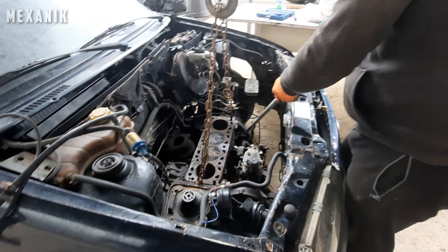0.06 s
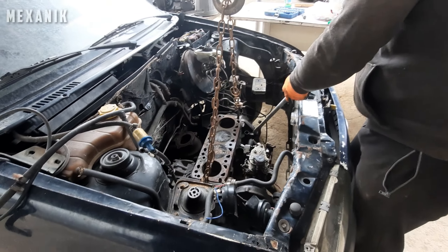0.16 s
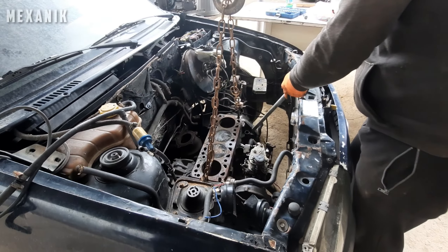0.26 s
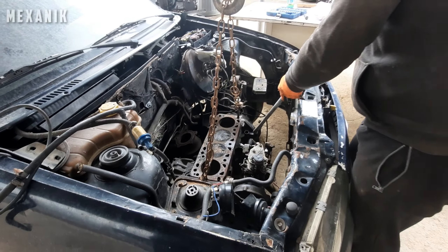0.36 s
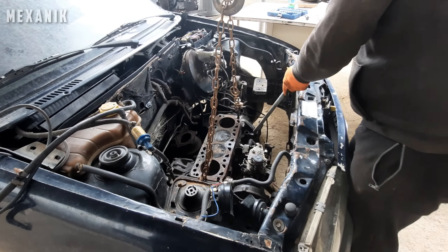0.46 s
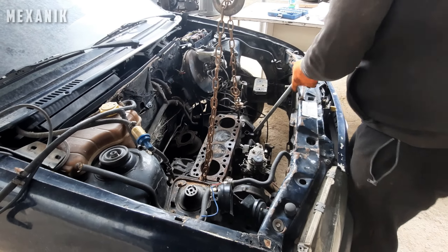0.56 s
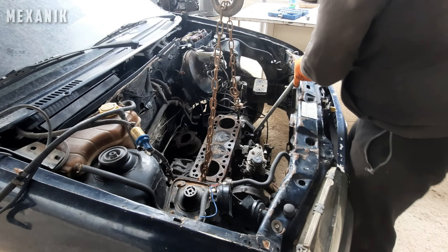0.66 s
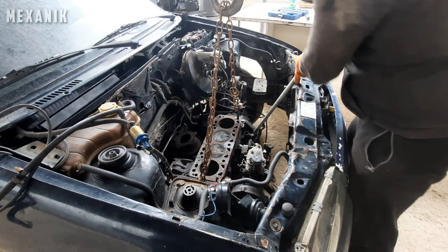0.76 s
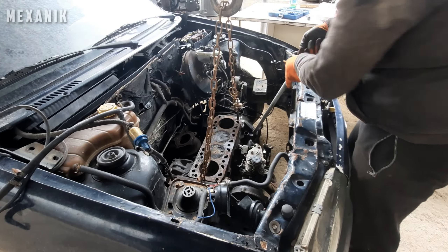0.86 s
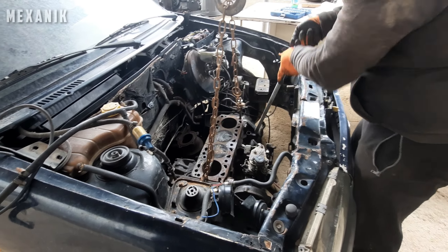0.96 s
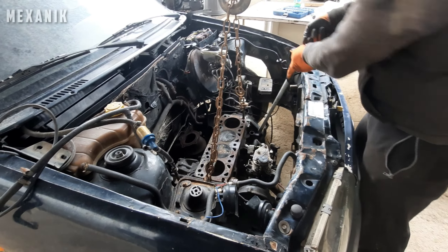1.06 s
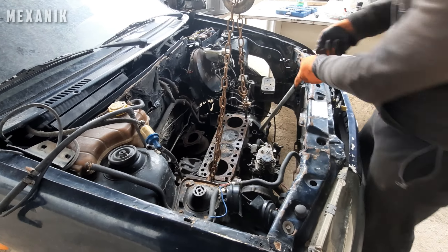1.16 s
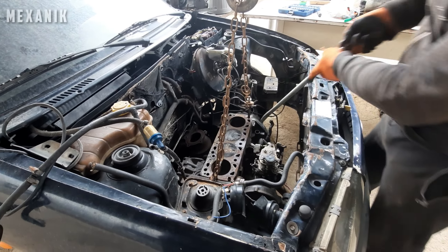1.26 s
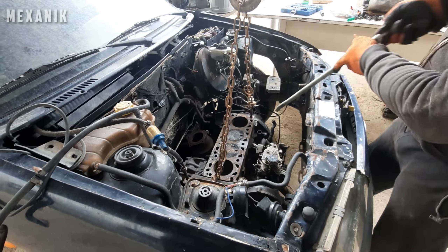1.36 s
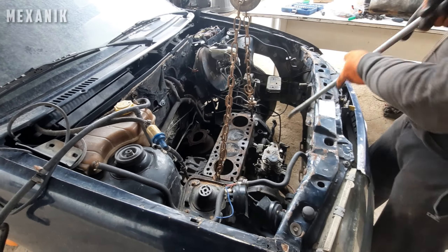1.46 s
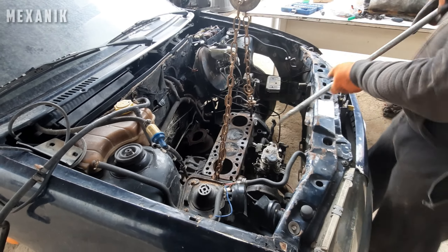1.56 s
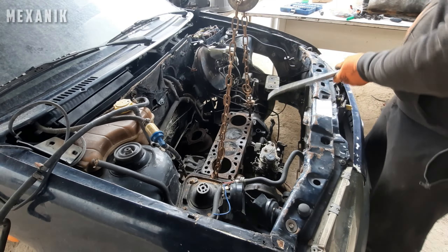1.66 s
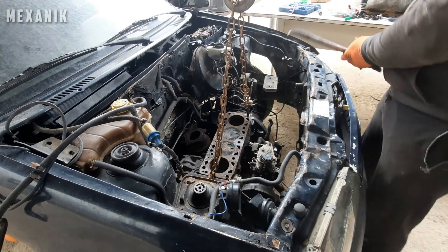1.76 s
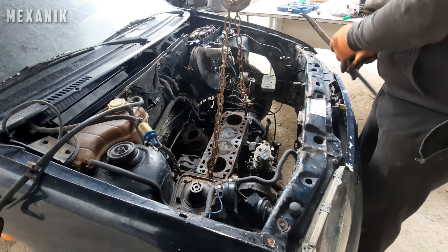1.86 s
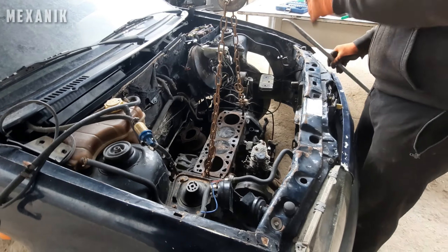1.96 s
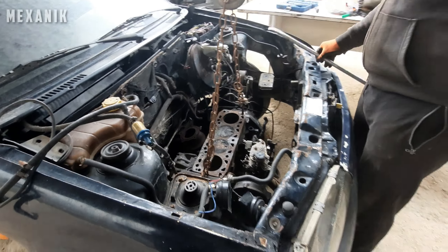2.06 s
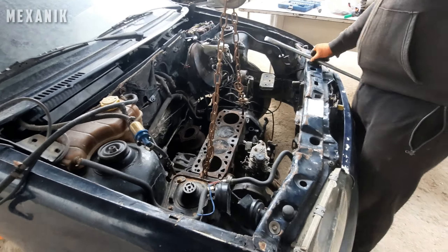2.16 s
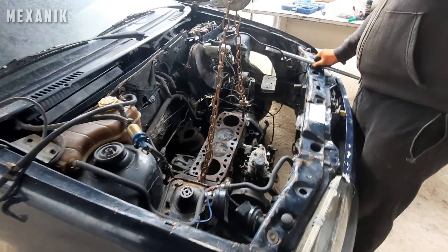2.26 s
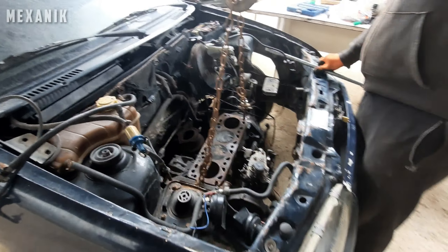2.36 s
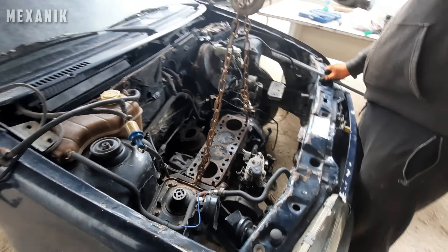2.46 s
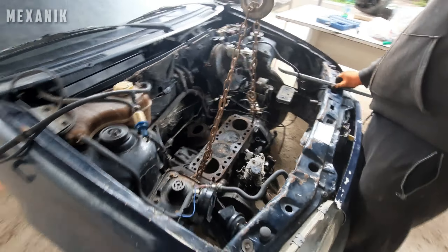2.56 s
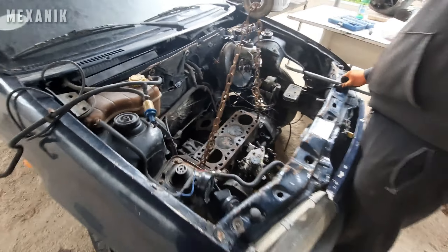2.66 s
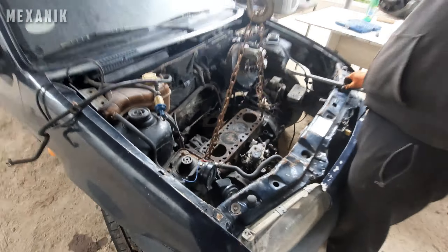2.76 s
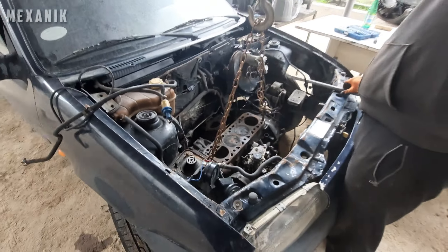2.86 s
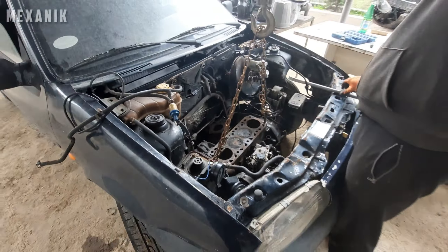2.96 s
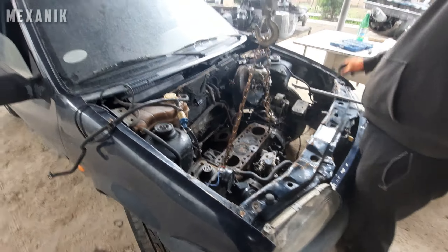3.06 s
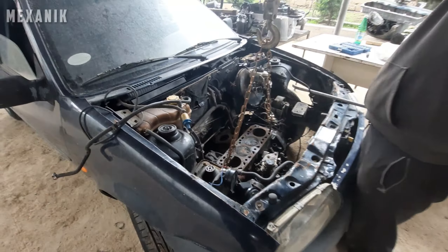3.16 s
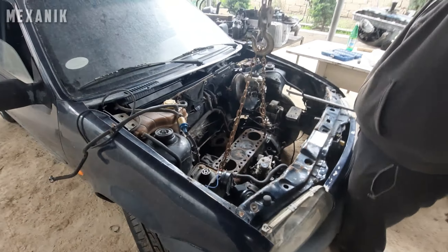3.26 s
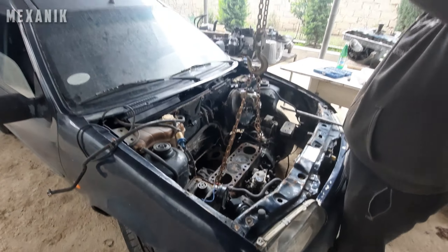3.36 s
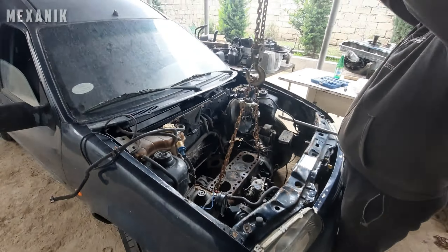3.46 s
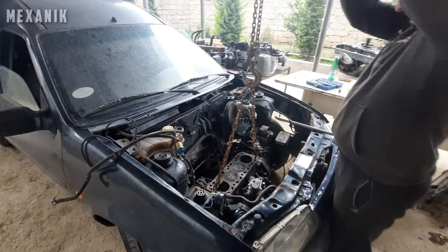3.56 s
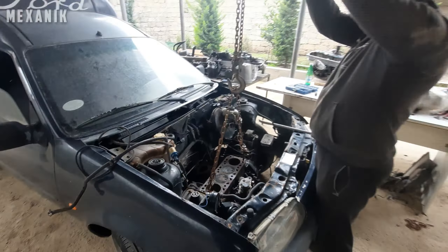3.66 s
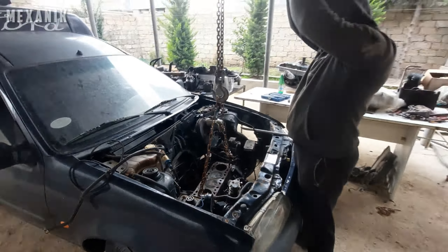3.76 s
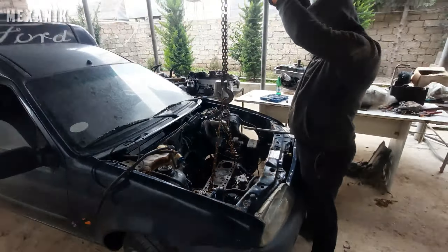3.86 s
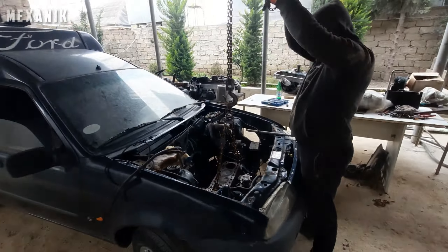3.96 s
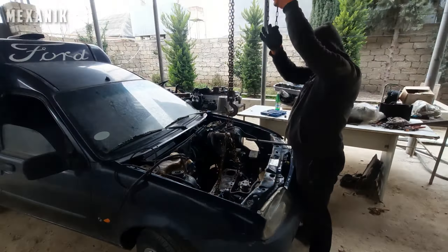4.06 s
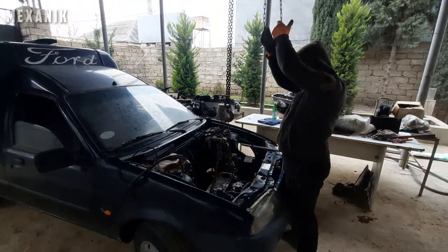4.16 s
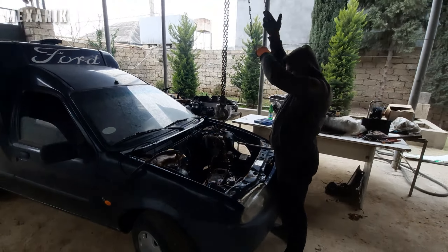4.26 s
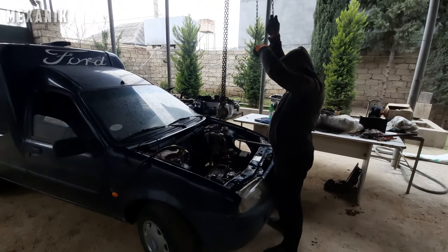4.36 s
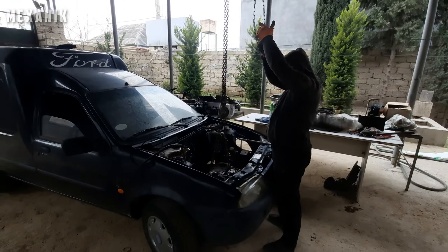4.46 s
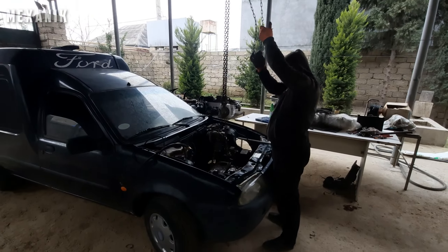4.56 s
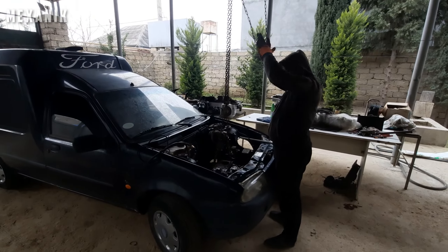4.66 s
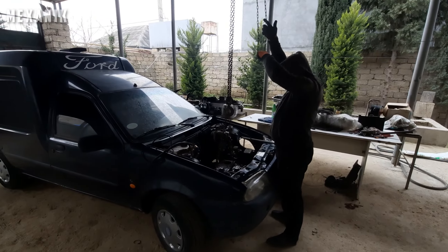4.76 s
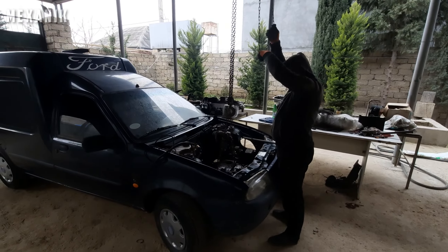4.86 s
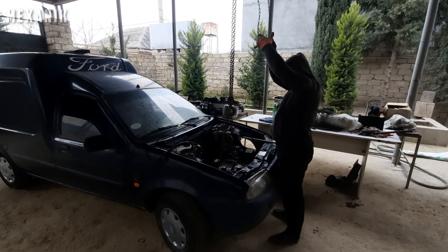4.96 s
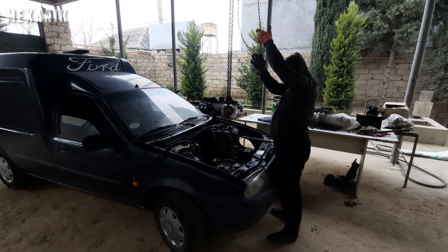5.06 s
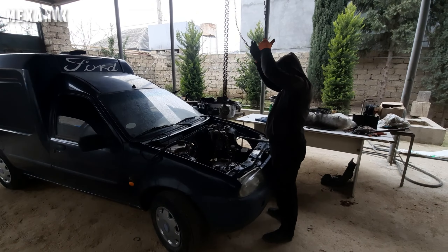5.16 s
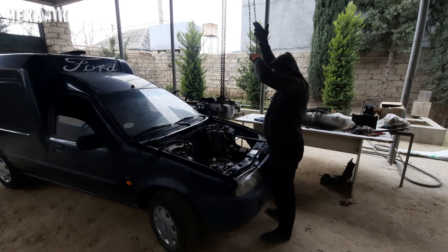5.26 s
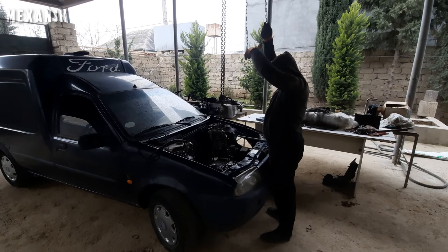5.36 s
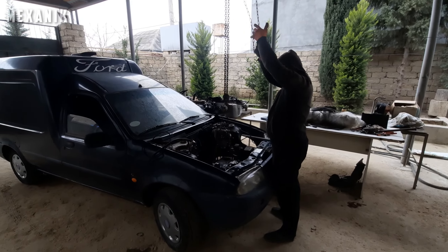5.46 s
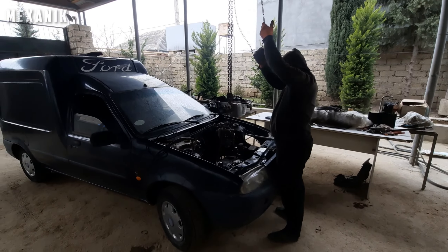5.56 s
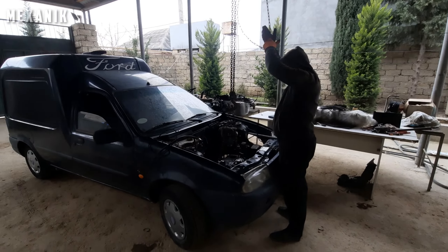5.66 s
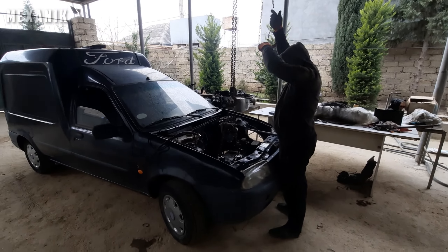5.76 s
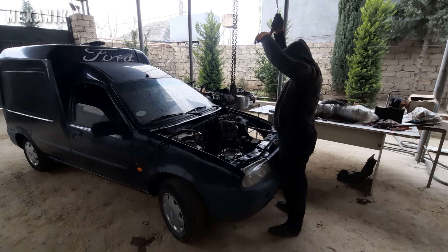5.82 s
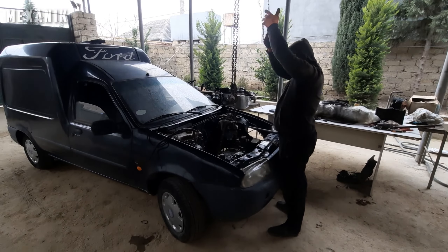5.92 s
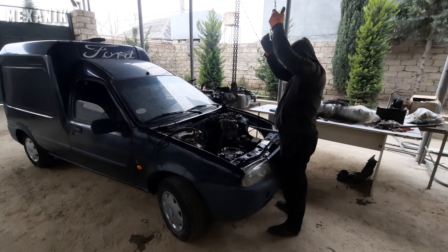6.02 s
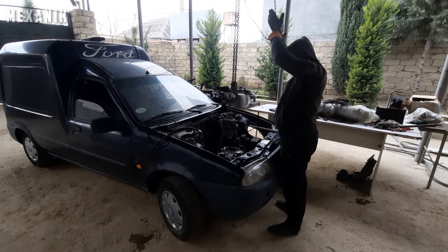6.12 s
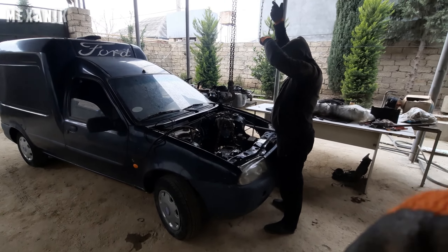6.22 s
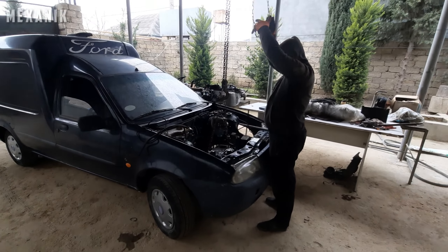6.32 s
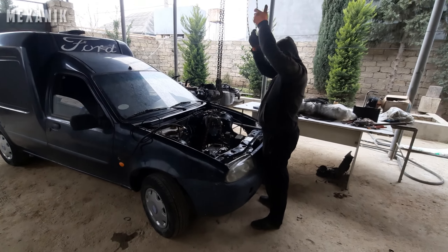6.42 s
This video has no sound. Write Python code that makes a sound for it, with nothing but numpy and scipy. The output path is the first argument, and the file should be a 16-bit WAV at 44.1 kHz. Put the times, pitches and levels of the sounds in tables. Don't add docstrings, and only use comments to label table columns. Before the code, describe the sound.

A steel bar lightly scrapes and knocks in an engine bay, then a chain hoist rattles loudly in short rhythmic pulls.

```python
import sys
import numpy as np
from scipy import signal
from scipy.fft import rfft, irfft, next_fast_len
from scipy.io import wavfile
from scipy.ndimage import uniform_filter1d

SR = 44100
rng = np.random.default_rng(int(sys.argv[2]) if len(sys.argv) > 2 else 0)


def gain_from_decibels(decibels):
    exponent = np.asarray(decibels, float) / 20
    return 10 ** exponent


def to_wav(s):
    ch = np.atleast_2d(s).T
    pcm = np.round(np.clip(ch, -1, 1) * 32767)
    wavfile.write(sys.argv[1], SR, pcm.astype(np.int16))


N = 286209

# grip, full speed and let go in seconds, rattle and beam levels in dB.
PULLS = [(3.0, 3.1, 3.093, -34.5, -28.5), (3.365, 3.37, 3.57, -61, -57), (3.445, 3.57, 3.62, -35.5, -29.5),
         (3.7, 3.72, 3.73, -47, -35), (3.755, 3.77, 3.894, -41.5, -32.5), (3.975, 4.1, 4.108, -34, -27),
         (4.202, 4.26, 4.32, -36.5, -35), (4.437, 4.53, 4.55, -36.5, -28.5), (4.6, 4.71, 4.756, -37.5, -32),
         (4.845, 4.85, 4.86, -43, -48), (4.93, 4.937, 5, -52, -45), (4.977, 5.08, 5.115, -35.5, -32.5),
         (5.195, 5.3, 5.323, -36, -31), (5.418, 5.55, 5.53, -36, -28), (5.655, 5.71, 5.78, -37, -32.5),
         (5.872, 5.97, 6.05, -39.5, -32.5), (6.126, 6.16, 6.235, -36, -31),
         (6.332, 6.41, 6.445, -36.5, -32)]
PULL_RISE, PULL_FALL = 90, 189
# start in seconds, peak in dB, ratchet ring in dB relative to it.
TAKEUPS = [(3.0046, -37, -30), (3.447, -23.5, -11), (3.7595, -14.5, -11.5), (3.977, -22, -22),
           (4.2285, -26, -14), (4.441, -20.5, -17), (4.846, -26, -4.5), (4.937, -26, -28),
           (4.979, -24, -34), (5.1983, -26, -24), (5.4204, -26, -15), (5.4432, -18.5, -22),
           (5.682, -20, -9), (5.873, -19, -11.5), (6.127, -26, -8.5), (6.335, -25.5, 1)]
# start in seconds, peak in dB.
CLINKS = [(3.0855, -26.5), (3.619, -24), (3.657, -28), (3.807, -37), (3.993, -31.5), (4.0955, -26.5),
          (4.116, -26), (4.23, -30), (4.602, -20.5), (4.71, -25.5), (4.727, -30), (4.8473, -34.5),
          (5.061, -24), (5.0934, -24), (5.5157, -29.5), (5.565, -29), (5.68, -33.5), (5.8733, -35),
          (5.95, -17), (6.413, -17), (6.429, -33), (6.458, -29)]
# start in seconds, peak in dB.
CLANGS = [(3.4473, -36.5), (3.572, -27), (3.606, -28), (4.247, -31), (4.445, -38.5), (5.0023, -38),
          (5.1105, -35), (5.445, -34), (5.512, -35), (5.6886, -38), (5.74, -31), (5.874, -36),
          (6.1368, -36), (6.1661, -31), (6.2008, -36), (6.339, -33.5)]
# frequency in Hz, width in Hz, level in dB.
LINK_MODES = [(1480, 146, 5.5), (2105, 35, -1), (3220, 110, -7), (4740, 220, 0), (4930, 44, 4),
              (5380, 50, -4), (6290, 90, -0.5), (7980, 69, -1), (9210, 67, -1), (10180, 110, 7),
              (10900, 200, 0), (11980, 73, -3)]
# frequency in Hz, level in dB per Hz.
RATTLE_COLOUR = [(410, -11.5), (700, -5.5), (1170, -4), (1520, -6.5), (3250, -3), (4100, -11), (4850, -3.5),
                 (5740, -8.5), (7520, -11), (10400, -8), (15300, -8.5)]
LINK_MISFIT = 0.003
# start in seconds, peak in dB, pitch in Hz.
PAWL_CLICKS = [(3.728, -42, 2230), (4.2435, -33, 2750), (4.28, -35, 1450), (4.4795, -36.5, 1931),
               (4.747, -34, 1560), (5.2248, -44, 2140), (5.257, -37, 1571), (5.4233, -42, 2376),
               (5.4957, -38.5, 1444), (5.5665, -36.5, 1480), (5.735, -41, 1540), (5.779, -39, 1567),
               (5.815, -39, 1570), (6.1694, -32, 1554)]

# frequency in Hz, width in Hz, level in dB.
BEAM_MODES = [(138, 39, -17), (183.4, 23, -6.5), (222.5, 15, 2.5), (264, 18, 1), (342.5, 83, -12)]
# frequency in Hz, width in Hz, level in dB.
BEAM_UPPER_MODES = [(434, 32, 2), (525, 22.2, 7.5), (600.4, 27.8, 3.5), (750, 21, -25)]
BEAM_LAG_S, BEAM_RISE, BEAM_FALL = 0.026, 72, 74
LOWEST_DB, LOWEST_FADES, LOWEST_FALL = -9.5, 3.65, 52
MIDDLE_DB, MIDDLE_GROWS = -2, 1.33
UPPER_DB, UPPER_GROWS, UPPER_FALL = -9.5, 1.83, 91
# start in seconds, peak in dB, pitch in Hz.
BOOMS = [(3.045, -28.5, 214), (3.195, -29, 215.5), (3.284, -40, 235), (3.504, -29, 246.6),
         (3.533, -23.5, 216.7), (3.621, -27.5, 217), (3.691, -36, 229), (3.722, -26, 223.4),
         (3.784, -24, 251), (3.856, -33, 237.6), (3.951, -31, 254), (4.051, -27.5, 221.7),
         (4.246, -36, 260.7), (4.453, -25, 248), (4.503, -21.5, 223.5), (4.657, -26, 225.6),
         (4.711, -22, 258.5), (4.739, -26.5, 264), (4.8, -30, 249), (4.867, -36, 173), (4.968, -39, 256),
         (5.064, -28, 215), (5.151, -25, 228), (5.284, -23.5, 222), (5.337, -32, 220),
         (5.427, -29.5, 225.5), (5.459, -28, 230), (5.517, -27, 229), (5.573, -19.5, 233.3),
         (5.625, -26.5, 303), (5.864, -29, 243), (5.903, -26, 253.3), (5.936, -36, 258), (5.974, -31, 261),
         (6.007, -24, 255.4), (6.189, -30, 255), (6.219, -27, 228), (6.297, -29, 258), (6.387, -29, 246),
         (6.437, -30, 219.6)]
# start in seconds, peak in dB, pitch in Hz.
HUMS = [(3.012, -40, 485), (3.048, -39, 481), (3.094, -29.5, 467), (3.128, -27, 476), (3.175, -35, 463),
        (3.496, -36, 542), (3.546, -28.5, 600), (3.701, -47, 474), (3.782, -35, 425), (3.86, -35, 587),
        (3.911, -33, 482), (4.092, -32, 427), (4.196, -34.5, 436.4), (4.24, -40, 518), (4.349, -41, 550),
        (4.516, -26, 506), (4.634, -34, 525.3), (5.063, -37, 522.1), (5.113, -39, 520), (5.212, -43, 517),
        (5.293, -31.5, 511.7), (5.341, -31.5, 517), (5.523, -39, 530), (5.61, -29, 514),
        (5.707, -36, 523.6), (5.782, -30.5, 519.2), (5.853, -38.5, 484.4), (5.9, -40, 460),
        (5.957, -26.5, 525), (6.057, -29, 564.1), (6.172, -31.5, 520), (6.238, -25.5, 510),
        (6.376, -37, 641), (6.418, -36, 537)]
BOOM_RISE_S, BOOM_T60_S, HUM_RISE_S, HUM_T60_S = 0.0081, 0.22, 0.0078, 0.16

# touch, full speed and lift in seconds, level in dB.
SLIDES = [(0.0, 0.04, 0.086, -67), (0.2, 0.204, 0.23, -74), (0.3, 0.31, 0.3, -74), (0.4, 0.408, 0.55, -78),
          (0.55, 0.64, 0.76, -74), (0.87, 0.95, 0.99, -75.5), (1.14, 1.19, 1.18, -75),
          (1.246, 1.25, 1.4, -60), (1.271, 1.276, 1.29, -48.5), (1.328, 1.332, 1.365, -37.5),
          (1.396, 1.4, 1.465, -43), (1.74, 1.83, 1.9, -67.5), (2.02, 2.07, 2.14, -67),
          (2.33, 2.44, 2.47, -55), (2.907, 2.912, 2.96, -58.5)]
SLIDE_RISE, SLIDE_FALL = 160, 212
SINGS_DB = -50
# frequency in Hz, level in dB per Hz.
SLIDE_COLOUR = [(180, -47.5), (300, -21.5), (570, -2.5), (965, -23), (1860, -6.5), (3310, -4), (5250, -6),
                (5700, -6.5), (10100, -11.5), (15300, -9.5)]
# frequency in Hz, width in Hz, level in dB.
BAR_MODES = [(1906, 32, 1.5), (2590, 40, 2.5), (2880, 50, 2), (3620, 47, 0.5), (5380, 25, -4),
             (6030, 32, -12), (6440, 32, -5.5), (7060, 30, -12), (7600, 39, -4), (8030, 29, -6),
             (8600, 31, -5), (8700, 54, -9), (9900, 56, -2), (10350, 32, -9), (11700, 34, -6)]
# touch, full speed and lift in seconds, grind and rumble levels in dB.
DRAGS = [(0.0, 0.02, 0.054, -69, -84), (0.48, 0.51, 0.69, -65, -74), (0.76, 0.78, 0.98, -60.5, -60),
         (1.05, 1.07, 1.21, -58.5, -56), (1.27, 1.33, 1.47, -54.5, -64), (1.62, 1.8, 1.96, -65, -76.5),
         (2.03, 2.06, 2.18, -50, -71), (2.36, 2.38, 2.44, -55, -56.5), (2.457, 2.47, 2.47, -38, -41.5),
         (2.58, 2.6, 2.7, -48.5, -47.5), (2.78, 2.84, 3.27, -55.5, -53.5)]
DRAG_RISE, DRAG_FALL, RUMBLE_FALL = 49, 92, 84
# frequency in Hz, level in dB per Hz.
GRIND_COLOUR = [(240, -41), (400, -14), (524, 1.5), (649, 1), (900, -4.5), (1640, -7), (2210, -15.5),
                (2850, -14), (3480, -20), (12000, -51), (15600, -76.5), (22000, -120)]
# frequency in Hz, width in Hz, level in dB.
PANEL_MODES = [(129, 22, 4.5), (218, 38, 3.5), (291, 37, 3.5), (384, 102, -1.5)]

# start in seconds, peak in dB, thud and crack in dB relative to it, main ring in Hz.
BODY_KNOCKS = [(0.763, -44.5, 3, -0.5, 663), (0.88, -38, -19, -32, 597), (0.932, -47, -26.5, -28, 535),
               (1.056, -41.5, -2.5, -38, 557), (2.052, -38, -38, -1, 798), (2.064, -41.5, -37, 10, 740),
               (2.367, -42, -13, -7, 705), (2.548, -48, -18, -15, 573), (2.584, -34, -15, -2, 666),
               (2.598, -28.5, -27, -13, 1156), (2.783, -41, -7, -28, 710), (2.909, -40, -1, -1, 1680),
               (5.572, -28, -23, -25, 743), (5.585, -28.5, -26, -30, 743), (0.488, -48.5, -15, -30, 537)]
# start in seconds, peak in # dB, thud and crack in dB
# relative to it, main ring in Hz.
IRON_KNOCKS = [(0.314, -46, -12.5, -21, 1970), (0.484, -39.5, -16, -18, 2090),
               (1.273, -34.5, -25, 1.5, 2030), (1.33, -35, -34, 0, 2880), (1.399, -42, -34, 14, 1960),
               (2.135, -35.5, -19, -16, 2070), (2.162, -26.5, -20.5, -12.5, 1610),
               (2.179, -44, -17, -6, 1530), (2.458, -21, -11, 1.5, 1720), (2.677, -28.5, -5.5, -5, 1790),
               (2.839, -34.5, -7.5, -27, 1174), (2.975, -35, -29.5, -18, 1440),
               (3.074, -42.5, -3, -17, 1440), (3.367, -43.5, -30, -9, 2610), (3.396, -41, -14, 3.5, 905),
               (4.479, -31, -30, -10, 1610)]
BODY_T60_S, IRON_T60_S = 0.097, 0.049
# frequency in Hz, level in dB.
BLOCK_MODES = [(590, -7), (650, -2), (775, -10), (1140, -11), (1420, -3), (1760, -7), (2120, -9.5),
               (2670, -9), (2950, -3.5)]
# start in seconds, peak in dB, strongest mode in Hz.
TAPS = [(0.0403, -47, 2780), (0.0594, -55, 2500), (0.0744, -62, 2530), (0.1216, -54, 4070),
        (0.1394, -54, 4090), (0.2034, -50.5, 2590), (0.2394, -55, 2810), (0.3132, -50, 2050),
        (0.4035, -59, 5830), (0.469, -50.5, 4090), (0.4846, -47, 2060), (0.7637, -51, 2450),
        (0.856, -48.5, 2100), (0.9328, -45, 2060), (2.5506, -48, 2660)]
# frequency in Hz, level in dB.
TAP_MODES = [(2080, 4), (2620, 3), (4150, 5), (5360, -7), (5880, 9), (6450, 5.5), (8130, 7)]
# start in seconds, peak in dB, strongest mode in Hz.
CHIMES = [
    (1.272, -61, 8100),
    (1.333, -33.5, 5363),
    (1.3975, -32.5, 9820),
]
# frequency in Hz, level in dB.
FREE_BAR_MODES = [(2860, -8), (5363, 4), (6536, 2.5), (8127, -2), (8500, -5), (9820, -3), (10470, -8.5)]
# start in seconds, peak in dB.
SNAPS = [(0.039, -50.5), (0.854, -52), (0.968, -63), (2.064, -53), (2.457, -38), (2.584, -51.5),
         (2.677, -49), (3.521, -37), (4.545, -40)]
# start in seconds, peak in dB, tilt in dB an octave.
HEAD_BLOWS = [
    (2.457, -18.5, -0.5),
    (2.677, -22.5, 2.5),
    (2.838, -31.5, 2),
    (2.971, -32.5, -2.5),
    (3.074, -31.5, 8),
    (3.153, -32, 0),
]
# frequency in Hz, level in dB, decay time t60 in seconds.
HEAD_MODES = [(272.3, -13, 0.38), (641, -13.5, 0.23), (783, -12.5, 0.13), (1145, 0, 0.097),
              (1220, -9, 0.033), (1414, -2.5, 0.08), (1695, -0.5, 0.035), (1757, 1, 0.046),
              (1995, -5, 0.048), (3020, -15, 0.032)]
# start in seconds, peak in dB, pitch in Hz, t60 in seconds.
SINGLE_NOTES = [(0.763, -43, 1440, 0.028), (0.768, -43, 307, 0.1), (0.88, -37.5, 805, 0.025),
                (0.79, -42, 580, 0.1), (0.931, -47, 2200, 0.036), (0.73, -45, 1200, 0.034),
                (1.058, -41.5, 330, 0.1), (0.87, -44.5, 690, 0.063), (1, -43, 180, 0.076),
                (1.272, -46, 1500, 0.059), (1.278, -40, 2200, 0.067), (2.551, -46, 2670, 0.073),
                (5.572, -30, 745, 0.29), (5.6, -37, 625, 0.34), (5.58, -38, 860, 0.2),
                (0.495, -52.5, 510, 0.28), (0.203, -61, 2600, 0.063), (0.04, -52, 2900, 0.06),
                (4.06, -39.5, 760, 0.19), (2.607, -31, 680, 0.086), (1.1, -59.5, 72, 0.5),
                (2.285, -54, 90, 0.17), (1.335, -35, 5363, 0.3), (1.4, -42, 5363, 0.2), (4.33, -48, 98, 0.3),
                (6.32, -46.5, 88, 0.3), (2.365, -44, 1010, 0.05), (2.64, -33.5, 264, 0.081),
                (5.6, -31, 370, 0.32)]
# start in seconds, peak in dB.
SKIPS = [(2.065, -38), (2.135, -39), (2.149, -36.5), (2.1619, -28), (2.1629, -29), (2.18, -38),
         (2.206, -43)]

# frequency in Hz, t60 in seconds.
SHED_T60 = [(150, 0.26), (1000, 0.31), (5000, 0.066), (14000, 0.14)]
# frequency in Hz, reflected level in dB relative to direct.
SHED_COLOUR = [(40, -5.5), (120, -26), (600, -10), (1500, -7), (4000, 1.5), (14000, -1.5)]
# frequency in Hz, level in dB per Hz.
YARD_COLOUR = [(15, -41), (25, -25), (55, -10.5), (189, 0), (461, -7.5), (637, -3), (812, -8), (1010, -7),
               (2970, -9), (7030, -31), (13100, -32), (15800, -18)]
YARD_DB = -69
TOP_HZ = 15560


def chain():
    impacts = jolts(1800, spread_db=5, hiss=0.8, channels=2)
    body = unit(filtered(impacts, coloured(RATTLE_COLOUR)))
    link_hits = jolts(285, spread_db=5.5, hiss=0.17, channels=2)
    links = patchy(filtered(link_hits, resonances(LINK_MODES)), depth_db=3.0)
    pulling = strokes(column(PULLS, index=3), PULL_RISE, PULL_FALL)
    x = pulling * spread(patchy(body + 0.42 * links, depth_db=2.0), alike=0.4)
    t = np.arange(SR // 5) / SR
    for s, db, ratchet_db in TAKEUPS:
        ratchet = ring([(1560, 0), (1640, -5), (2120, -6)], t, 0.09, 2) + 0.8 * shake(t, 1650, 0.3, 0.07)
        slack = gain_from_decibels(db - 18.0) * shake(t, 5900, 1.87, 0.049)
        x += struck(s, slack + gain_from_decibels(db + ratchet_db - 10.0) * ratchet)
    for s, db in CLINKS:
        pitch = 1 + LINK_MISFIT * rng.normal()
        clink = ring([(10270, 3.0), (10050, -5), (10170, -5)], t * pitch, 0.081, 3.3)
        x += struck(s, gain_from_decibels(db - 6.5) * clink + gain_from_decibels(db - 13.5) * shake(t, 12000, 0.37, 0.021))
    for s, db in CLANGS:
        pitch = 1 + 2 * LINK_MISFIT * rng.normal()
        clang = ring([(4650, 2), (4800, -4), (4930, 3), (5090, -1)], t * pitch, 0.066, 3.6)
        x += struck(s, gain_from_decibels(db - 1.0) * clang)
    return x


def pawl_clicks():
    t = np.arange(SR // 3) / SR
    x = np.zeros(N)
    for s, db, hz in PAWL_CLICKS:
        x += struck(s, gain_from_decibels(db) * (note(t, hz, 0.0015, 0.059) + 0.61 * shake(t, hz, 0.88, 0.087)))
    return x


def beam():
    rows = column(PULLS, index=4)
    hauled_s = np.arange(N) / SR - PULLS[0][0]
    shakes = jolts(204.4, spread_db=1, hiss=0.76)
    lowest_gain = strokes(rows, BEAM_RISE, LOWEST_FALL, BEAM_LAG_S, soft_s=0.02)
    low_gain = strokes(rows, BEAM_RISE, BEAM_FALL, BEAM_LAG_S, soft_s=0.016)
    upper_gain = strokes(rows, BEAM_RISE, UPPER_FALL, BEAM_LAG_S, soft_s=0.0084)
    lowest = gain_from_decibels(LOWEST_DB - LOWEST_FADES * hauled_s) * unit(filtered(shakes, resonances([(135.6, 12.7, 0)])))
    deep = filtered(shakes, resonances(BEAM_MODES[:3]))
    middle = gain_from_decibels(MIDDLE_DB + MIDDLE_GROWS * hauled_s) * filtered(shakes, resonances(BEAM_MODES[3:]))
    upper = patchy(filtered(shakes, resonances(BEAM_UPPER_MODES)), depth_db=1.5)
    upper = gain_from_decibels(UPPER_DB + UPPER_GROWS * hauled_s) * upper
    return lowest_gain * lowest + low_gain * unit(deep - middle) + upper_gain * upper


def beam_booms():
    t = np.arange(SR // 3) / SR
    x = np.zeros(N)
    for s, db, hz in BOOMS:
        x += struck(s - 0.006, gain_from_decibels(db + 1.5) * note(t, hz, BOOM_RISE_S, BOOM_T60_S))
    for s, db, hz in HUMS:
        x += struck(s - 0.004, gain_from_decibels(db) * note(t, hz, HUM_RISE_S, HUM_T60_S))
    return x


def bar_friction():
    slide = strokes(SLIDES, SLIDE_RISE, SLIDE_FALL)
    grind = strokes(column(DRAGS, index=3), DRAG_RISE, DRAG_FALL, soft_s=0.017)
    rumble = strokes(column(DRAGS, index=4), DRAG_RISE, RUMBLE_FALL)
    grit = jolts(900, spread_db=4, hiss=1.3, channels=2)
    singing = 0.69 * np.clip(slide / gain_from_decibels(SINGS_DB), 0, 1) * unit(filtered(grit, resonances(BAR_MODES)))
    bright = unit(filtered(grit, coloured(SLIDE_COLOUR))) + singing
    bumps = jolts(894, spread_db=2.5, hiss=1.85)
    dull = grind * patchy(filtered(bumps, coloured(GRIND_COLOUR)), depth_db=2.5)
    drumming = rumble * unit(filtered(bumps, resonances(PANEL_MODES)))
    return gain_from_decibels(2.0) * slide * spread(bright, alike=0.81) + dull + drumming


def bar_knocks():
    x, blows, t = np.zeros(N), np.zeros(N), np.arange(SR // 4) / SR
    for knocks, t60 in [(BODY_KNOCKS, BODY_T60_S), (IRON_KNOCKS, IRON_T60_S)]:
        for s, db, thud_db, crack_db, hz in knocks:
            modes = favoured(BLOCK_MODES, hz, 6) + [(hz, 0.5)]
            clank = ring(modes, t, 1.4 * t60, 2, stiff=0.7) + 0.5 * shake(t, hz, 0.7, 0.6 * t60)
            crack = gain_from_decibels(db + crack_db - 5.0) * shake(t, 2500, 0.63, 0.023)
            x += struck(s, gain_from_decibels(db - 4.0) * clank + crack)
            thud = rng.standard_normal(len(t)) * gain_from_decibels(-60 * t / 0.23)
            blows += struck(s, gain_from_decibels(db + thud_db + 12.5) * thud)
    return x + filtered(blows, resonances(PANEL_MODES))


def bar_rings():
    x, t = np.zeros(N), np.arange(SR // 4) / SR
    for s, db, hz in TAPS:
        x += struck(s, gain_from_decibels(db - 1.5) * ring(favoured(TAP_MODES, hz, 14), t, 0.034, 2.2))
    for s, db, hz in CHIMES:
        singing = ring(favoured(FREE_BAR_MODES, hz, 9), t, 1.1, 1.6, stiff=0.73)
        x += struck(s, gain_from_decibels(db) * (singing + 2.0 * shake(t, 8700, 0.85, 0.035)))
    for s, db in SNAPS:
        x += struck(s, gain_from_decibels(db) * shake(t, 7000, 1.6, 0.026))
    return x


def head_blows():
    t = np.arange(SR // 3) / SR
    x = np.zeros(N)
    for s, db, tilt_db in HEAD_BLOWS:
        for hz, level, t60 in HEAD_MODES:
            mode_db = db - 6.5 + level + tilt_db * np.log2(hz / 1400)
            x += struck(s, gain_from_decibels(mode_db) * note(t, hz, 0.00085, t60))
        x += struck(s + 0.002014, gain_from_decibels(db - 11.5) * shake(t, 1260, 0.45, 0.072))
    return x


def single_notes():
    t = np.arange(SR // 3) / SR
    return sum(struck(s, gain_from_decibels(db + 1.5) * note(t, hz, 0.0015, t60)) for s, db, hz, t60 in SINGLE_NOTES)


def skips():
    t = np.arange(SR // 3) / SR
    x = np.zeros(N)
    for s, db in SKIPS:
        notes = note(t, 1700, 0.00019, 0.0088) + note(t, 2890, 0.00027, 0.0092)
        x += struck(s, gain_from_decibels(db) * (notes + 0.32 * shake(t, 2270, 0.47, 0.015)))
    return x


def shed(x):
    hop = SR // 5
    padded = np.pad(x, ((0, 0), (hop, 2 * hop)))
    pieces = np.lib.stride_tricks.sliding_window_view(padded, 2 * hop, axis=1)[:, ::hop]
    hz, t, z = signal.stft(rng.standard_normal((2, pieces.shape[1], SR // 4)), SR, nperseg=256)
    fade = gain_from_decibels(-60 * t / along(SHED_T60, hz)[:, None])
    fade = fade / np.sqrt(np.mean(fade ** 2, axis=1, keepdims=True))
    z = z / np.std(z) * fade * gain_from_decibels(along(SHED_COLOUR, hz))[:, None]
    tails = signal.istft(z, SR, nperseg=256)[1] * gain_from_decibels(-61.5)
    window = np.sin(np.pi * np.arange(2 * hop) / (2 * hop))
    answers = signal.fftconvolve(pieces * window, tails, axes=2)
    wet = np.zeros((2, N + SR))
    for k in range(answers.shape[1]):
        wet[:, k * hop:k * hop + answers.shape[2]] += answers[:, k]
    return wet[:, hop:hop + N]


def yard():
    a, b = rng.standard_normal((2, N))
    mid = filtered(a, coloured(YARD_COLOUR))
    width = [(100, -18.5), (1500, 0.5)]  # Hz, side relative to mid in dB
    side = filtered(b, lambda f: gain_from_decibels(along(YARD_COLOUR, f) + along(width, f)))
    return gain_from_decibels(YARD_DB) * np.array([mid + side, mid - side]) / np.std(mid)


def ports(x, lag, left_db):
    half = np.array([[1], [-1]]) / 2
    return filtered(x, lambda f: gain_from_decibels(left_db * half) * np.exp(-2j * np.pi * f * (lag * half + 8) / SR))


def spread(pair, alike):
    turn = np.arccos(np.clip(alike, 0, 1)) / 2
    return np.cos(turn) * pair[0] + np.sin(turn) * np.array([pair[1], -pair[1]])


def jolts(per_second, spread_db, hiss, channels=1):
    when = rng.random((channels, N))
    size, rub = rng.standard_normal((2, channels, N))
    hits = np.clip((per_second / SR - when) * SR / 20, 0, 1)
    hits = hits * gain_from_decibels(spread_db * np.clip(size, -2, 2)) * np.sign(rub)
    return unit(unit(hits) + hiss * rng.standard_normal((channels, N)))


def strokes(rows, rise, fall, lag_s=0, soft_s=0.0017):
    touch, full, lift, db = np.transpose(rows)[..., None]
    t = np.arange(0, N, 32) / SR - lag_s
    level = db - rise * np.maximum(full - t, 0) - fall * np.maximum(t - lift, 0)
    power = (gain_from_decibels(level) * np.clip((t - touch) / soft_s, 0, 1)) ** 2
    return np.interp(np.arange(N) / SR - lag_s, t, np.sqrt(power.sum(0)))


def column(rows, index):
    return [(*row[:3], row[index]) for row in rows]


def patchy(x, depth_db):
    z = signal.stft(x, nperseg=512)[2]
    field = uniform_filter1d(rng.standard_normal(z.shape[-2:]), size=5, axis=0)
    field = uniform_filter1d(field, size=9, axis=1)
    return unit(signal.istft(z * gain_from_decibels(depth_db * unit(field)), nperseg=512)[1][..., :N])


def ring(modes, t, t60, scatter_db, stiff=0):
    gains = [gain_from_decibels(db + scatter_db * rng.normal()) for hz, db in modes]
    x = np.zeros(len(t))
    for gain, (hz, db) in zip(gains, modes):
        decay = gain_from_decibels(-60 * t / t60 * (hz / 1000) ** stiff)
        x += gain * np.sin(2 * np.pi * (hz * t + rng.random())) * decay
    return x / np.linalg.norm(gains) * (1 - np.exp(-t / 0.0002))


def favoured(modes, hz, db_per_octave):
    return [(c, level - db_per_octave * abs(np.log2(c / hz))) for c, level in modes]


def note(t, hz, rise_s, t60):
    return np.sin(2 * np.pi * hz * t) * gain_from_decibels(-60 * t / t60) * (1 - np.exp(-t / rise_s))


def shake(t, hz, octaves, t60):
    band = signal.butter(2, [hz / 2 ** octaves, hz * 2 ** octaves], "band", fs=SR, output="sos")
    return unit(signal.sosfilt(band, rng.standard_normal(len(t)))) * gain_from_decibels(-60 * t / t60)


def struck(s, sound):
    start = round(s * SR)
    return np.pad(sound, (start, max(N - start - len(sound), 0)))[:N]


def resonances(modes):
    def response(f):
        return sum((-1) ** k * gain_from_decibels(db) * 1j * f * w / (c * c - f * f + 1j * f * w)
                   for k, (c, w, db) in enumerate(modes))
    return response


def coloured(points):
    return lambda f: gain_from_decibels(along(points, f))


def filtered(x, response):
    m = next_fast_len(N + SR // 2)
    return irfft(rfft(x, m) * response(np.fft.rfftfreq(m, 1 / SR)), m)[..., :N]


def along(points, hz):
    f, v = np.transpose(points)
    return np.interp(np.log(hz + 1), np.log(f + 1), v)


def unit(x):
    return x / np.sqrt(np.mean(x ** 2) + 1e-20)


def scene():
    drumming = gain_from_decibels(-4) * filtered(beam(), lambda f: f / (f - 60j))
    low = ports(drumming + beam_booms(), lag=1.2, left_db=-2.0)
    contacts = bar_knocks() + bar_rings() + head_blows() + single_notes() + skips()
    engine_bay = ports(bar_friction() + contacts + pawl_clicks(), lag=4.1, left_db=-2.5)
    direct = low + engine_bay + ports(chain(), lag=4.08, left_db=-2.0)
    return gain_from_decibels(-0.55) * (direct + shed(direct)) + yard()


def low_pass(x):
    return signal.sosfilt(signal.butter(12, 16650, fs=SR, output="sos"), x)


def record(dry):
    heard = filtered(dry, lambda f: (f / (f - 45j)) ** 2 * (f < TOP_HZ))
    return low_pass(heard)


dry = scene()
out = record(dry)
to_wav(out)
```